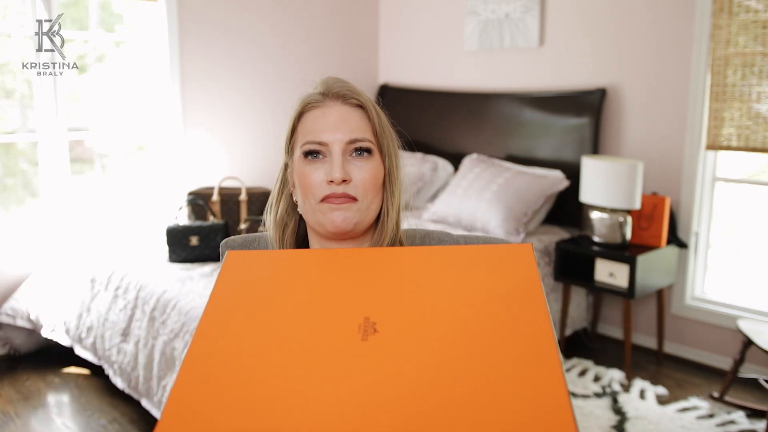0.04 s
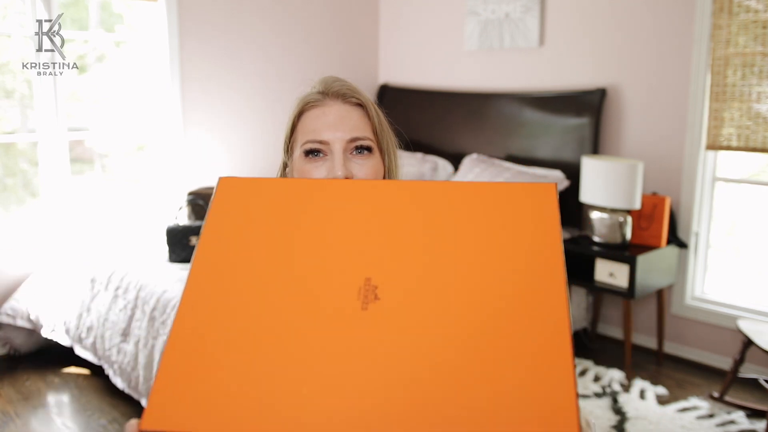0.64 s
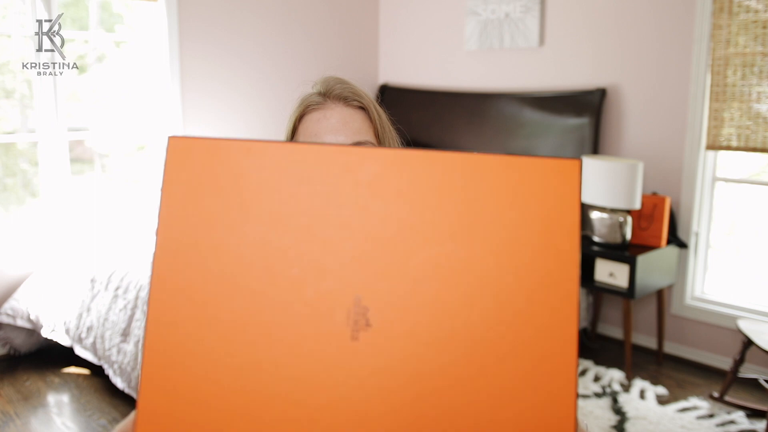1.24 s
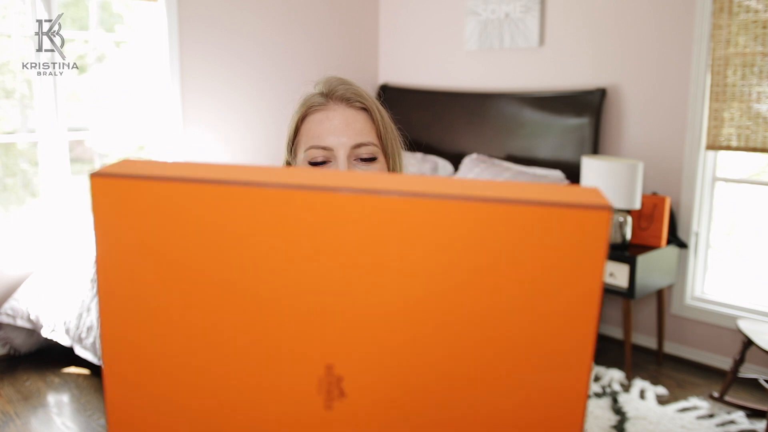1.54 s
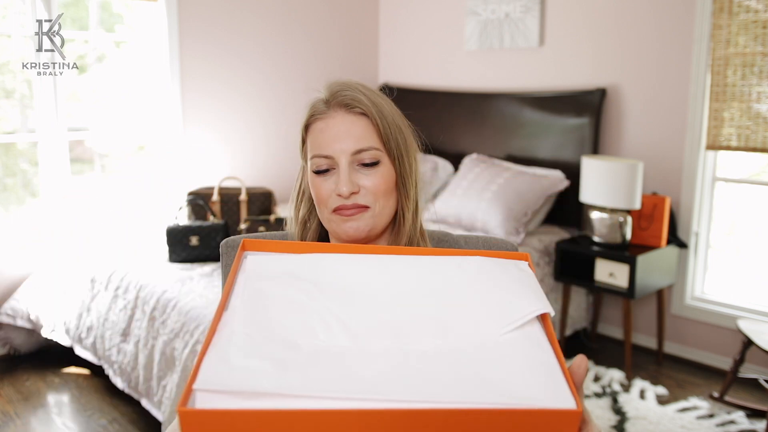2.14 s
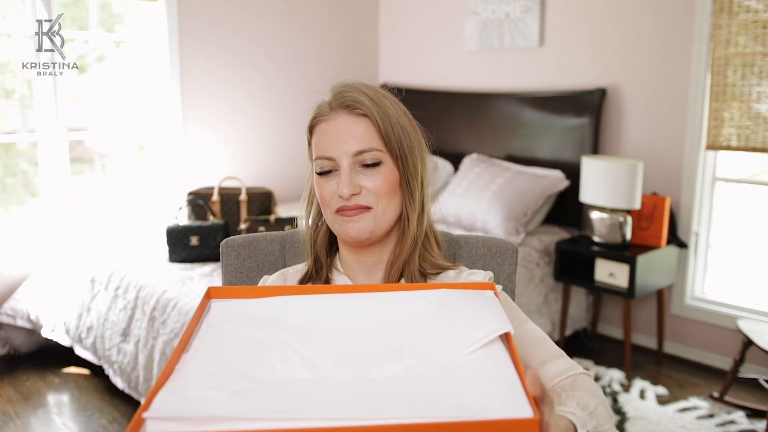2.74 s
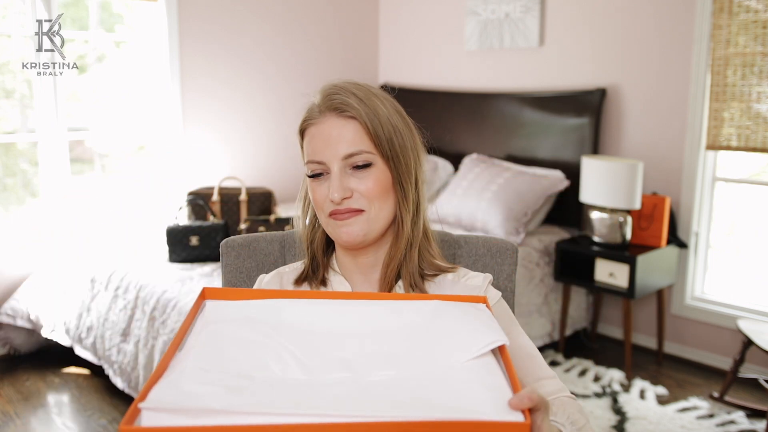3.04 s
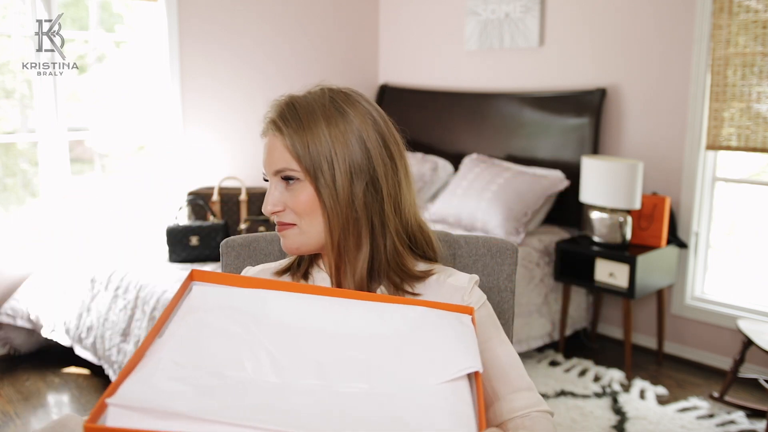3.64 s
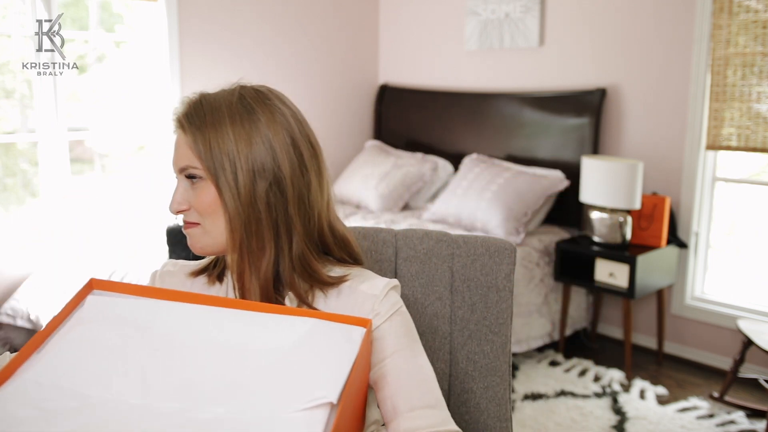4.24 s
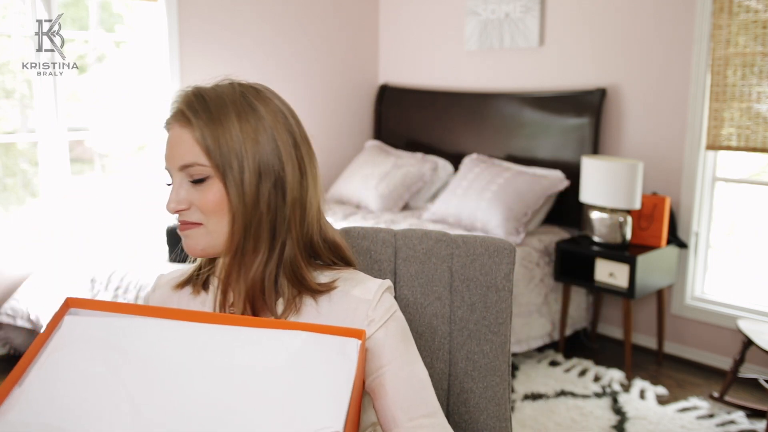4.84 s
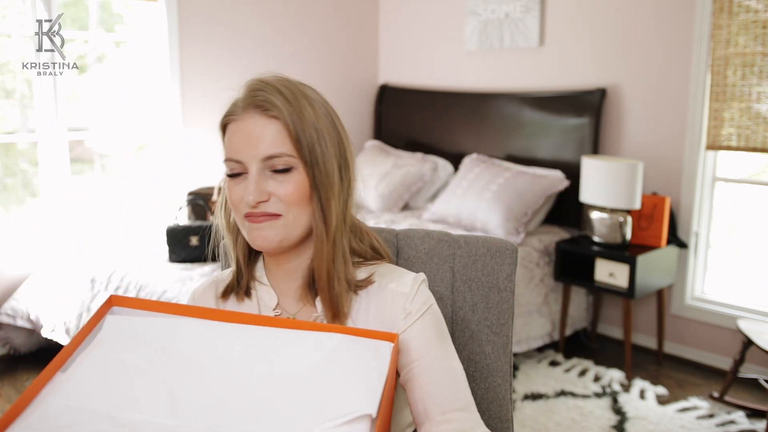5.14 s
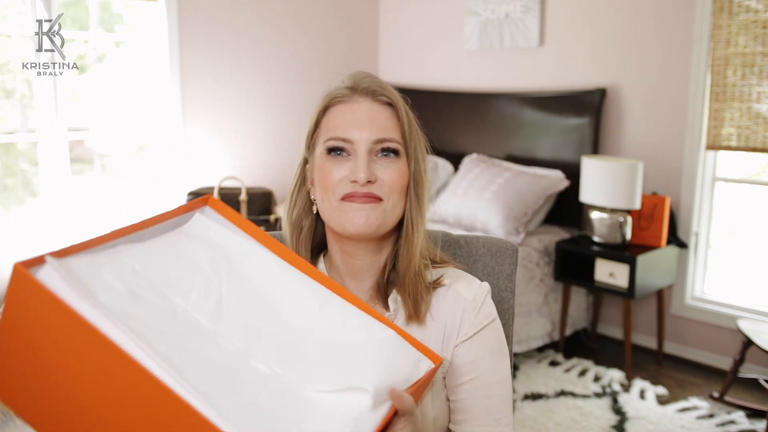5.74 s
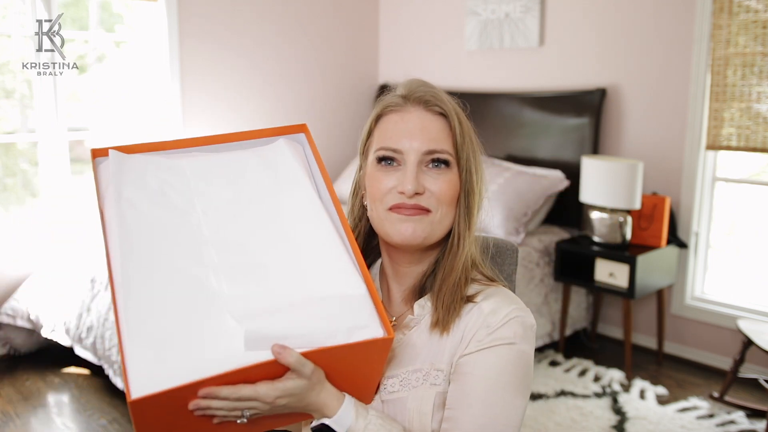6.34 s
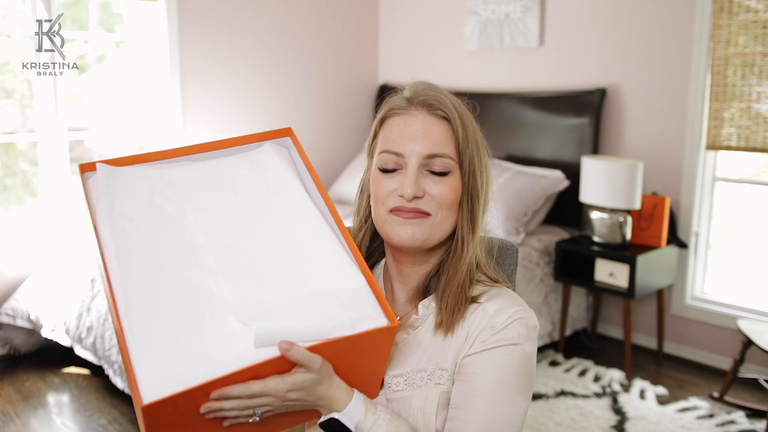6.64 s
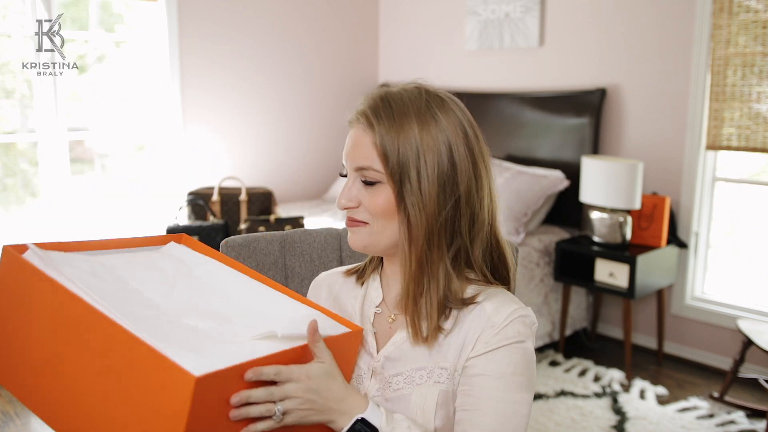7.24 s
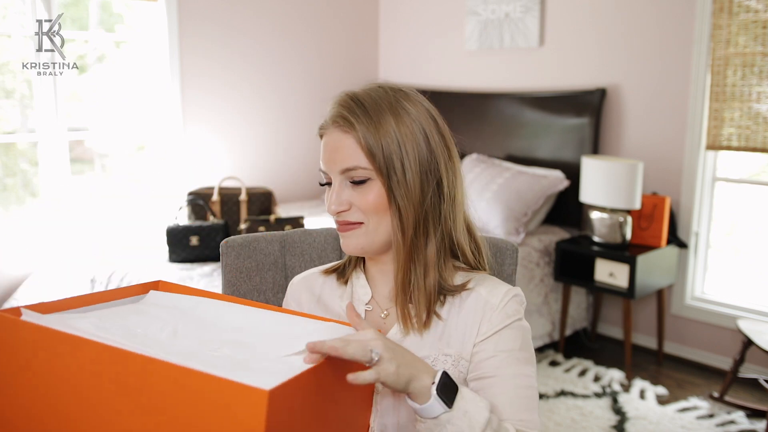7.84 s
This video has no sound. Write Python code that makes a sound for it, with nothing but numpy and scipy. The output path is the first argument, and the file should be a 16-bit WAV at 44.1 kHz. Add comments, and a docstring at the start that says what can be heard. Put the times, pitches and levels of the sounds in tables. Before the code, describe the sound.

Low cardboard rubbing and a few tiny squeaks end in a knock as a gift box is opened near the microphone. Light taps and soft tissue paper rustles follow, until the lid hits the floor and slaps twice, the loudest sound, with a short room echo. After a hollow thump, the paper keeps crackling gently as hands slide over the box in the quiet room.

```python
"""Cardboard rubs and squeaks close by as the tight lid slides off a stiff gift box in a bedroom.
The lid is carried aside and dropped: it lands on an edge and slaps flat twice, and its panels ring.
Tissue paper rustles and ticks as hands tilt the box and small creases give way. Sleeves brush the
box with a hiss, fingers tap its walls, and bumps make it boom, all over the quiet air of the room."""
import sys
import numpy as np
from scipy import signal
from scipy.fft import rfft, irfft, next_fast_len
from scipy.io import wavfile
from scipy.ndimage import map_coordinates

SR = 44100
rng = np.random.default_rng(int(sys.argv[2]) if len(sys.argv) > 2 else 0)


def unload_wav(signal):
    """Save mono or channel-first audio to the path in sys.argv[1] as 16-bit WAV at rate SR, clipped to [-1, 1]."""
    wavfile.write(
        sys.argv[1],
        SR,
        np.round(np.clip(np.atleast_2d(signal).T, -1, 1) * 32767).astype(np.int16),
    )


N = 356830

# Each hit of the falling lid: start_s, level_db, hardness_hz, boom_db, room_db, edge_click_db
LID_LANDINGS = [(4.1728, -29.5, 963, 6, -3.5, -31.5), (4.181, -31.5, 451, 4.5, -5, -32.5),
                (4.196, -32, 554, -4.5, 9, -20), (4.231, -36, 800, 5.5, 6, -13.5),
                (4.4522, -40, 900, 1.5, -1.5, -29.5), (4.463, -37, 400, 13.5, -1, -36),
                (4.484, -38.5, 500, 8, -1.5, -34.5), (4.5005, -15, 5930, -12, -2.5, -11.5),
                (4.504, -17, 5000, -1.5, -1.5, -19.5), (4.645, -28, 1480, -11, 9, -10),
                (4.6539, -18, 2790, -7, -3.5, -4.5), (4.666, -18, 2200, 3.5, 10, -4)]
# The pitches at which the lid's panels ring: pitch_hz, width_hz, lift_db
LID_RESONANCES = [(169, 20.9, 3.5), (234, 22, 9), (307, 21, 8), (632, 14, 2.5), (489, 22, 5),
                  (568, 20, 5.5), (682, 12, 9.5), (1000, 15, 1.5), (1200, 25, 2), (1247, 30, 1),
                  (1545, 44, 5.5), (1912, 33, 4), (2060, 31, -2), (2170, 19, 2.5), (2460, 20, 7),
                  (3040, 30, 2.5)]
# Cardboard rubs on cardboard or under the hands: start_s, length_s, level_db
RUB_STROKES = [(0, 0.01, -46.5), (.06, 0.19, -49), (.27, 0.024, -46), (.425, 0.063, -42), (.56, 0.32, -54),
               (.79, 0.59, -49.5), (1.39, 0.11, -43.5), (1.645, 0.017, -47), (2.1, 0.35, -57.5),
               (2.87, .08, -53.5), (3.045, 0.022, -49.5), (3.39, 0.14, -56.5), (3.65, 0.0085, -49),
               (3.76, 0.27, -58.5), (4.85, .07, -56), (5.1, 0.04, -45)]
# The lid sticks and slips: start_s, length_s, level_db, start_pitch_hz, end_pitch_hz, jitter_share
LID_SQUEAKS = [(0.583, 0.031, -37.5, 312, 380, 0.05), (.649, 0.0089, -40, 440, 453, 0.1),
               (0.68, 0.0193, -36.5, 370, 463, 0.13), (0.738, 0.009, -47, 445, 450, 0.05),
               (3.429, 0.078, -54.5, 1062, 1110, .13), (5.356, 0.11, -54, 2100, 2060, 0.02)]
# Hands and lid knock on the box: start_s, level_db, pitch_hz
WALL_KNOCKS = [(0.456, -42, 257), (.819, -44, 820), (.934, -39, 550), (1.145, -41, 540), (1.437, -38, 605),
               (1.453, -23, 520), (1.457, -42, 905), (2.346, -38.5, 740), (2.3518, -30.5, 355),
               (2.665, -44.5, 840), (2.874, -43, 880), (2.903, -48, 596), (2.963, -46, 655),
               (3.382, -38.5, 970), (3.386, -42, 455), (3.579, -42, 1000), (5.081, -28.5, 352),
               (5.865, -44.5, 220), (6.442, -46.5, 593), (6.752, -48.5, 1320), (6.864, -47, 1026),
               (8.077, -42, 1610)]
# The tones of a knocked wall: pitch_ratio, level_db, ring_time_ratio
WALL_TONES = [(0.452, -17, 2.87), (0.999, 8, 0.47), (1.25, -2.5, 0.42), (1.8, -16.5, 1.34)]
# The box booms as the lid comes free and when bumped: start_s, level_db, pitch_hz, ring_s
BOX_BUMPS = [(.47, -37, 205, .15), (1.46, -50, 75, .3), (1.455, -34, 185, .18), (2.352, -35, 320, .06),
             (2.352, -38, 175, .14), (5.081, -19.5, 181, .16), (5.081, -26, 256, .19),
             (5.081, -31, 335, .2)]
# The tissue shifts as the box is tilted: start_s, length_s, level_db
TISSUE_RUSTLES = [(0, 0.0067, -48), (1.0, 0.37, -60), (1.68, .11, -60), (2.1, 0.59, -57),
                  (2.325, 0.049, -49), (2.76, 0.045, -57.5), (2.86, 0.1, -55.5), (3.03, 0.058, -52),
                  (3.17, 0.027, -56), (3.38, 0.434, -61), (4.18, 0.097, -54), (4.3, 0.19, -60),
                  (5.08, .79, -51), (5.14, 0.12, -52.5), (5.4, 0.18, -49), (5.9, .38, -60.5),
                  (6.1, 0.11, -60.5), (6.36, 0.093, -66.5), (6.58, 0.041, -54), (6.66, 0.36, -64.5),
                  (6.755, 0.02, -56.5), (7.15, 0.071, -63.5), (7.39, 0.42, -68), (7.675, 0.093, -54.5),
                  (7.83, 0.046, -50.5), (7.9, 0.056, -59.5)]
# The sharpest snaps of creased tissue and cardboard: start_s, level_db, pitch_hz
CREASE_SNAPS = [(2.0352, -52, 2480), (2.115, -49.5, 4800), (2.8765, -44.5, 5500), (2.9183, -45.5, 4660),
                (3.1913, -46.5, 4160), (3.2013, -43.5, 1640), (3.288, -45, 4530), (3.383, -47, 3160),
                (3.579, -48.5, 4900), (3.6296, -46, 4700), (3.7012, -43.5, 5700), (4.2205, -42.5, 5060),
                (4.3257, -50.5, 5200), (4.675, -33.5, 7100), (5.2769, -45, 4300), (5.3138, -38.5, 3670),
                (5.7983, -41, 5300), (5.8428, -42.5, 4480), (5.869, -46.5, 4100), (5.9883, -52, 6900),
                (6.0184, -41.5, 6300), (6.111, -39.5, 5150), (6.1962, -43.5, 3440), (6.218, -50, 4090),
                (6.3657, -44, 4800), (6.5815, -45.5, 3800), (6.753, -47, 3700), (6.8644, -43.5, 4120),
                (7.1801, -50.5, 4490), (7.6768, -43, 4540), (7.7415, -45.5, 4400), (7.8615, -42, 5000)]
# Sleeves and palms slide over the box: start_s, length_s, level_db
SLEEVE_SLIDES = [(-.04, 0.067, -58), (0.754, 0.13, -68), (0.947, 0.22, -70), (2.048, 0.77, -64.5),
                 (2.814, 0.13, -63), (3.017, 0.085, -66), (3.57, .14, -72), (5.334, 0.42, -53.5),
                 (5.6, .12, -61.5), (5.748, 0.43, -71), (6.802, .22, -68), (7.432, 0.075, -64),
                 (7.802, 0.19, -60)]
# How long the bedroom's echo takes to fade by 60 dB: pitch_hz, fade_s
ECHO_TIMES = [(100, 0.6), (300, 0.44), (1000, 0.45), (3500, 0.36), (7000, 0.41), (14000, 0.096)]

# The tone colour of each sound, from bass to treble: pitch_hz, level_db
SLAP_COLOUR = [(40, -37.5), (85, -24), (155, -11.5), (260, -3), (400, -4.5), (650, -4), (1200, -6),
               (2100, -8.5), (3500, -9.5), (7000, -22), (10000, -36), (16000, -48)]  # the lid landing
RUB_COLOUR = [(35, -56.5), (60, -25), (86, -32), (116, -17.5), (168, -3.5), (216, -2), (304, -3.5),
              (623, -3.5), (706, -6), (865, -6), (1160, -14.5), (2500, -28), (3250, -44), (5500, -120)]  # cardboard rubbing
PAPER_COLOUR = [(500, -27.5), (1100, 3.5), (2100, 1.5), (3300, 0), (4500, -2.5), (6500, -5), (8500, -17),
                (16000, -21)]  # tissue rustling
HISS_COLOUR = [(4000, -37.5), (7500, 6), (9500, 5), (13000, 5.5), (16000, -10)]  # the fine hiss of sliding
SHEEN_COLOUR = [(8000, -30.5), (11000, -4), (13500, -2.5), (16000, -6.5)]  # the bright top of a fast slide
AIR_COLOUR = [(18, -64.5), (30, -43), (70, -14.5), (161, 2.5), (227, -3.5), (273, 3), (374, -11), (499, -6),
              (1010, -17.5), (1430, -21), (4650, -26), (6550, -26), (8520, -29.5), (14800, -28.5),
              (16000, -32)]  # the quiet room

GRIP_RUB_DB, GRIP_PAPER_DB = -63, -66  # the hands never hold the box quite still
TOP_HZ = 16000


def dropped_lid():
    """Each landing is a sharp crack that rings the lid's panels and sets off the room's echo."""
    def panel_db(hz):
        peaks = sum(lift / (1 + (2 * (hz - pitch) / width) ** 2) for pitch, width, lift in LID_RESONANCES)
        return along(SLAP_COLOUR, hz) + peaks

    out = np.zeros(N)
    for start_s, level_db, hardness_hz, boom_db, room_db, edge_click_db in LID_LANDINGS:
        echo = room_echo()
        t = np.arange(len(echo)) / SR
        crack = burst(fading_noise(t, 0.014), 1 / SR)
        hit = amp(-4.5) * crack + amp(room_db) * echo
        # a soft landing loses its treble, all but the click of the edge
        softness = lambda hz: np.hypot(1 / (1 + (hz / hardness_hz) ** 2), amp(edge_click_db - 1))
        panels = lambda hz: amp(panel_db(hz) + boom_db / (1 + (hz / 600) ** 2))
        slap = coloured(hit, lambda hz: softness(hz) * panels(hz))
        add(out, start_s, amp(level_db) * burst(slap, 0.034))
    return out


def box_booms():
    """A soft push on the whole box sets its broad panels and the air between them swinging."""
    out, t = np.zeros(N), np.arange(SR // 3) / SR
    for start_s, level_db, pitch_hz, ring_s in BOX_BUMPS:
        loudness = amp(level_db - 60 * t / ring_s) * (1 - np.exp(-t * pitch_hz))
        swing = loudness * np.sin(2 * np.pi * pitch_hz * t)
        add(out, start_s, low_cut(swing, edge_hz=pitch_hz * 0.75))
    return in_room(out, echo_db=-17)


def wall_knocks():
    """A knock scuffs the wall and rings it briefly; the pitch depends on where it lands."""
    out, t = np.zeros(N), np.arange(SR // 4) / SR
    for start_s, level_db, pitch_hz in WALL_KNOCKS:
        base_ring_s = 15.6 / pitch_hz  # higher knocks die sooner
        ring = np.zeros(len(t))
        for pitch_ratio, tone_db, time_ratio in WALL_TONES:
            loudness = amp(tone_db + rng.normal(0, 1.4) - 60 * t / (base_ring_s * time_ratio))
            ring += loudness * np.sin(2 * np.pi * pitch_hz * pitch_ratio * t)
        ring *= 1 - np.exp(-t / 0.0021)  # a soft start
        scuff = coloured(fading_noise(t, 0.035), lambda hz: 1 / (1 + (hz / (2.7 * pitch_hz)) ** 3))
        knock = burst(ring, 0.0064) + amp(-11.5) * burst(scuff, 0.0054)
        add(out, start_s, amp(level_db) * in_room(knock, echo_db=-10))
    return low_cut(out, edge_hz=114)


def lid_squeaks():
    """Tight cardboard sticks and slips so quickly and evenly that it makes a note."""
    out = np.zeros(N)
    for start_s, length_s, level_db, start_hz, end_hz, jitter in LID_SQUEAKS:
        progress = np.linspace(0, 1, int(length_s * SR))
        glide_hz = start_hz + (end_hz - start_hz) * progress
        pitch_hz = glide_hz * (1 + jitter * wobble(693)[:len(progress)])
        phase = 2 * np.pi * np.cumsum(pitch_hz) / SR
        note = sum(np.sin(k * phase) / k ** 2.36 for k in range(1, 7))
        swell = np.abs(np.sin(np.pi * progress)) ** 0.5
        add(out, start_s, amp(level_db) * unit(note * swell))
    return in_room(low_cut(out, edge_hz=380), echo_db=-9)


def cardboard_rub(rubbing, rustling):
    """Cardboard drags with a low, rough sound; the box also sounds along when the tissue moves."""
    box_power = power(-51.5) * (rustling / rustling.max()) ** 0.87
    loudness = np.sqrt(rubbing + box_power + power(GRIP_RUB_DB))
    return loudness * friction(RUB_COLOUR, slips_per_s=300, spread_db=2.5, smooth_db=-2, clump_db=1.7)


def tissue_rustle(rubbing, rustling):
    """Tissue slides and its small folds give way; rubbing cardboard adds a similar scrape."""
    loudness = np.sqrt(rustling + rubbing * power(-13) + power(GRIP_PAPER_DB))
    sheet = friction(PAPER_COLOUR, slips_per_s=900, spread_db=1.5, smooth_db=3, clump_db=2.34)
    folds = friction(PAPER_COLOUR, slips_per_s=70, spread_db=2.5, smooth_db=-20, clump_db=1)
    return loudness * (sheet + amp(-7.5) * folds)


def crease_snaps():
    """A crease buckles with a tick and nudges the sheet around it."""
    out, t = np.zeros(N), np.arange(SR // 5) / SR
    band = lambda hz, centre_hz, narrow: 1 / np.hypot(1, narrow * (hz / centre_hz - centre_hz / (hz + 1)))
    for start_s, level_db, pitch_hz in CREASE_SNAPS:
        tick_gain = lambda hz: band(hz, pitch_hz, 2.1) / np.hypot(1, (hz / 9500) ** 2)
        tick = coloured(fading_noise(t, 0.0088), tick_gain)
        sheet = coloured(fading_noise(t, 0.026), lambda hz: band(hz, 1220, 2.4))
        snap = burst(tick, 0.0036) + amp(-7.5) * burst(sheet, 0.0051)
        add(out, start_s, amp(level_db) * in_room(snap, echo_db=-13.5))
    return out


def sliding_hiss(rubbing, rustling):
    """Sleeves and palms hiss as they speed up and slow down; tissue and cardboard add a little."""
    t = np.arange(N) / SR
    sliding = rustling * power(-21) + rubbing * power(-34)
    for start_s, length_s, level_db in SLEEVE_SLIDES:
        speed = np.abs(np.sin(np.pi * np.clip((t - start_s) / length_s, 0, 1)))
        sliding += (amp(level_db) * speed ** 1.7) ** 2
    loudness = np.sqrt(sliding)
    hiss = friction(HISS_COLOUR, slips_per_s=510, spread_db=6, smooth_db=2.5, clump_db=1.2)
    sheen = friction(SHEEN_COLOUR, slips_per_s=900, spread_db=4.5, smooth_db=8, clump_db=-0.2)
    brightness = (loudness / loudness.max()) ** 0.4  # the fastest slides are the brightest
    return loudness * (amp(-2) * hiss + brightness * sheen)


def room_air():
    """The quiet bedroom is a faint, steady, low noise."""
    return amp(-64) * unit(coloured(rng.standard_normal(N), lambda hz: amp(along(AIR_COLOUR, hz))))


def room_echo():
    """A fresh random echo of the bedroom, with energy 1; the highest treble dies first."""
    hz, t, spectrum = signal.stft(rng.standard_normal(SR * 3 // 4), SR, nperseg=256)
    fade = amp(-60 * t / along(ECHO_TIMES, hz)[:, None])
    echo = signal.istft(spectrum * fade, SR, nperseg=256)[1]
    return echo / np.linalg.norm(echo)


def in_room(x, echo_db):
    """The direct sound, with the room's echo 4 ms behind it."""
    delayed = np.pad(x, (SR // 250, 0))
    return x + amp(echo_db) * signal.fftconvolve(delayed, room_echo())[:len(x)]


def friction(colour, slips_per_s, spread_db, smooth_db, clump_db):
    """Tiny slips of uneven size over smooth sliding noise, swelling in clumps; average level 1."""
    sizes = amp(spread_db * np.minimum(rng.exponential(size=N), 4))
    slips = (rng.random(N) < slips_per_s / SR) * rng.choice([-1, 1], N) * sizes
    smooth = amp(smooth_db) * rng.standard_normal(N)
    force = (unit(slips) + smooth) * amp(clump_db * wobble(45))
    return unit(coloured(force, lambda hz: amp(along(colour, hz))))


def strokes(rows, rise_s, fall_s):
    """The total power of movements that each rise, hold and die away."""
    t = np.arange(N) / SR
    rise = lambda start: np.clip(0.5 + (t - start) / (2 * rise_s), 0, 1)
    fall = lambda end: np.exp(-np.maximum(t - end, 0) / fall_s)
    return sum((amp(db) * rise(start) * fall(start + length)) ** 2 for start, length, db in rows)


def low_cut(x, edge_hz):
    """Small panels give off little deep bass."""
    return signal.sosfilt(signal.butter(3, edge_hz, "highpass", fs=SR, output="sos"), x)


def coloured(x, gain):
    """Turn each frequency of x up or down by gain(hz)."""
    size = 2 * next_fast_len(len(x) // 2 + 4096)
    log_gain = np.log(np.maximum(gain(np.fft.rfftfreq(size, 1 / SR)), 1e-6))
    # fold the filter forward in time, so it rings only after a sound arrives
    folded = irfft(log_gain, size)
    folded[1:size // 2] *= 2
    folded[size // 2 + 1:] = 0
    return irfft(rfft(x, size) * np.exp(rfft(folded)), size)[:len(x)]


def fading_noise(t, fade_s):
    """A puff of noise that falls by 60 dB in fade_s."""
    return rng.standard_normal(len(t)) * amp(-60 * t / fade_s)


def wobble(rate):
    """A smooth random curve through rate points a second."""
    return map_coordinates(rng.standard_normal(int(N * rate / SR) + 4), [np.arange(N) * rate / SR])


def along(points, hz):
    """Read between the rows of a (pitch_hz, value) table, spaced by octaves."""
    pitches, values = np.transpose(points)
    return np.interp(np.log(hz + 1), np.log(pitches), values)


def add(track, start_s, x):
    """Mix x into the track at start_s."""
    i = max(round(start_s * SR), 0)
    track[i:i + len(x)] += x[:max(N - i, 0)]


def burst(x, span_s):
    """Give x the energy of a sound of level 1 lasting span_s."""
    return x * np.sqrt(span_s * SR / (np.sum(x ** 2) + 1e-20))


def unit(x):
    """Scale x to an average (rms) level of 1."""
    return x / np.sqrt(np.mean(x ** 2) + 1e-20)


def amp(db):
    """Turn decibels into a volume factor."""
    return 10 ** (np.asarray(db) / 20)


def power(db):
    """Turn decibels into power, which adds up when noises mix."""
    return amp(db) ** 2


def scene():
    """All the sounds of the box over the quiet air of the room, in one channel."""
    air = room_air()
    hand_pressure = power(1.47 * wobble(14))  # the hands press unevenly
    rubbing = strokes(RUB_STROKES, rise_s=0.024, fall_s=0.073) * hand_pressure
    rustling = strokes(TISSUE_RUSTLES, rise_s=0.035, fall_s=0.042)
    handling = cardboard_rub(rubbing, rustling) + tissue_rustle(rubbing, rustling)
    handling = in_room(handling + sliding_hiss(rubbing, rustling), echo_db=-12.5)
    hits = dropped_lid() + wall_knocks() + box_booms()
    return (hits + handling + lid_squeaks() + crease_snaps() + air)[None]


def record(dry):
    """The recorder keeps nothing above TOP_HZ."""
    size = next_fast_len(N + SR // 2)
    kept = np.fft.rfftfreq(size, 1 / SR) < TOP_HZ
    return irfft(rfft(dry, size) * kept, size)[..., :N]


dry = scene()
out = record(dry)
unload_wav(out)
```